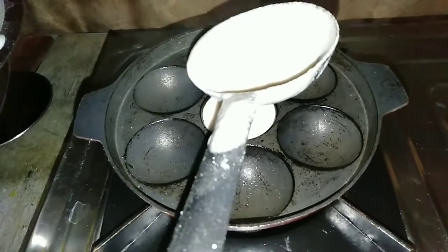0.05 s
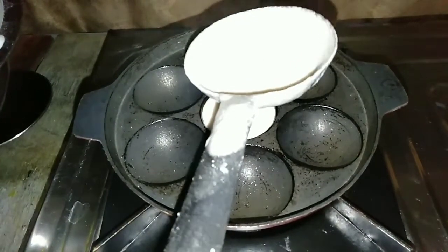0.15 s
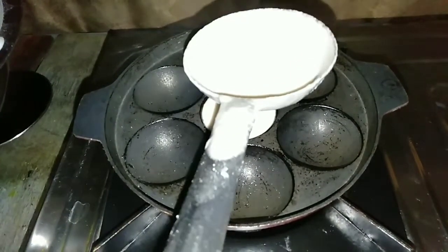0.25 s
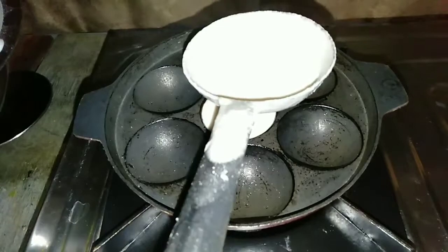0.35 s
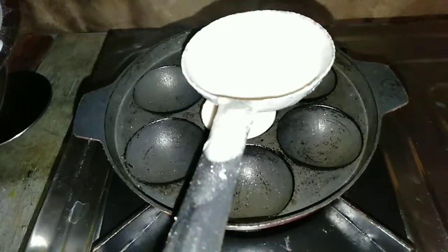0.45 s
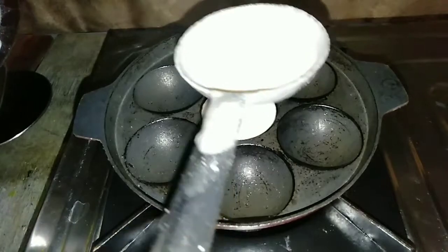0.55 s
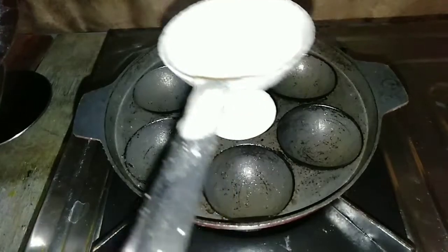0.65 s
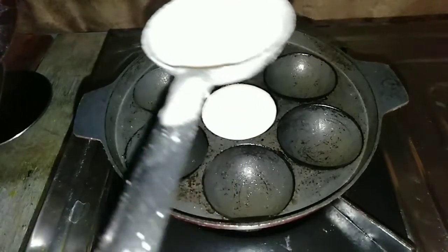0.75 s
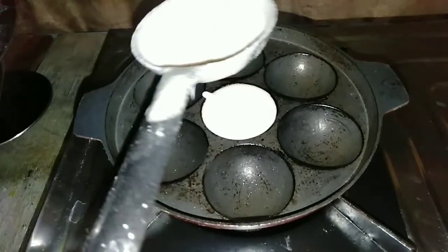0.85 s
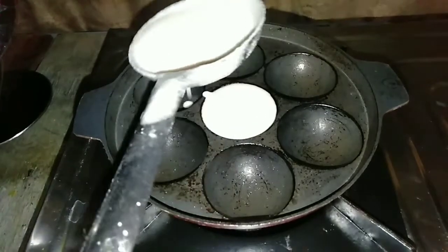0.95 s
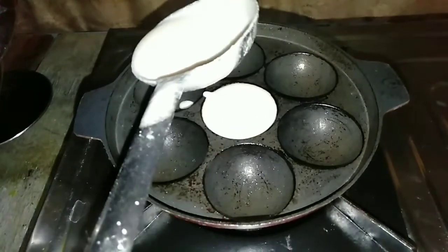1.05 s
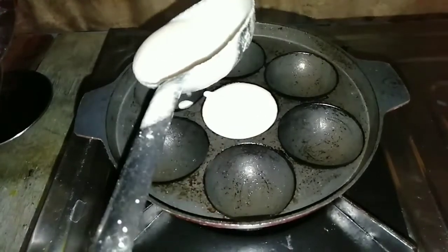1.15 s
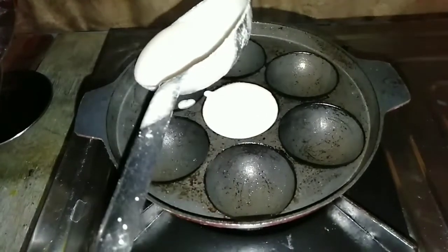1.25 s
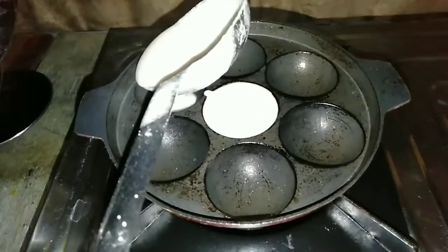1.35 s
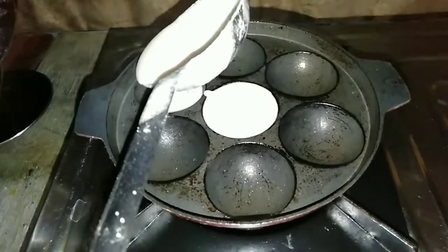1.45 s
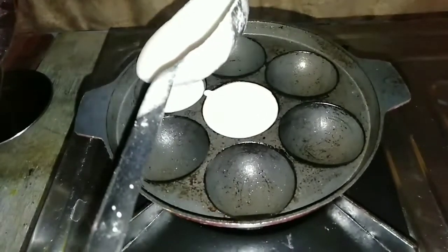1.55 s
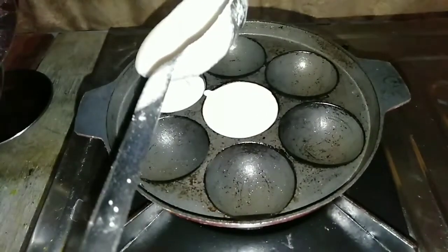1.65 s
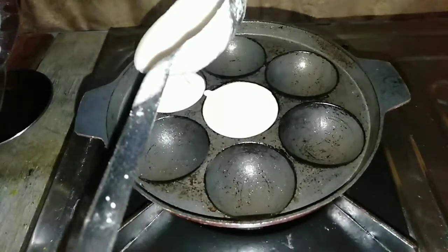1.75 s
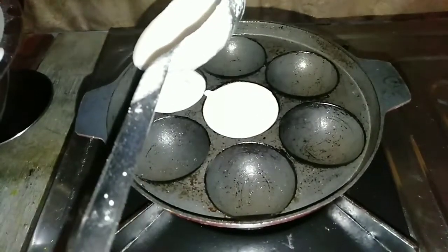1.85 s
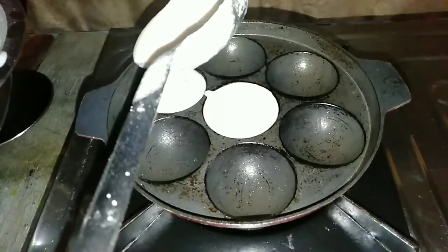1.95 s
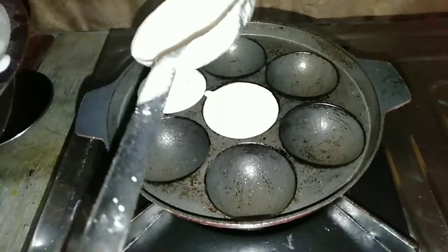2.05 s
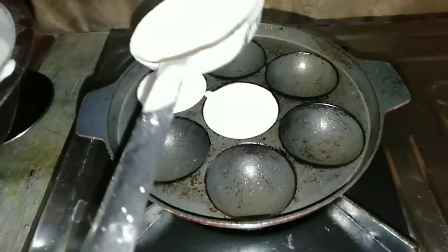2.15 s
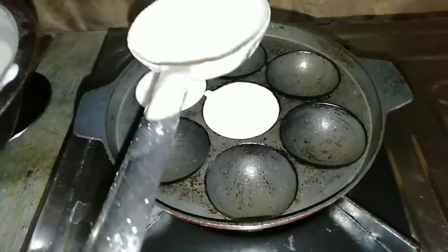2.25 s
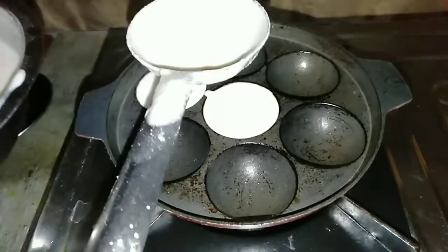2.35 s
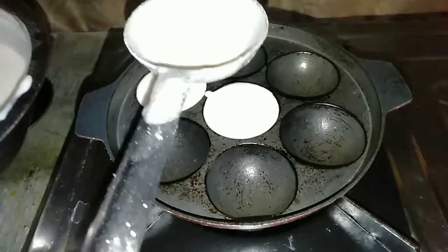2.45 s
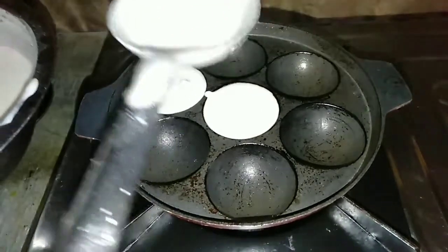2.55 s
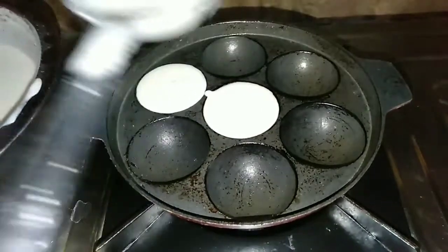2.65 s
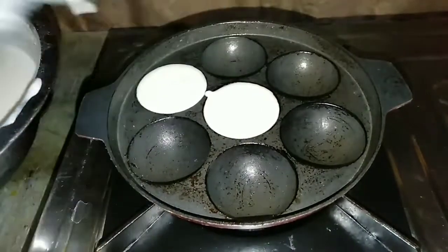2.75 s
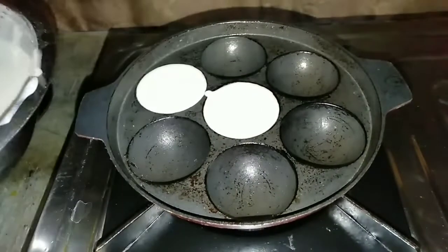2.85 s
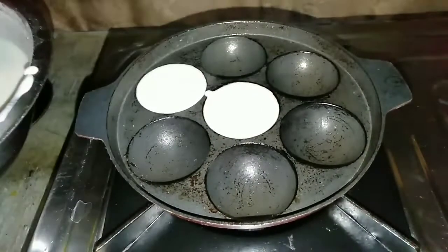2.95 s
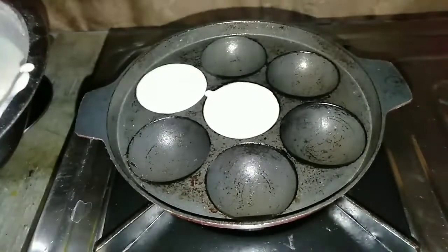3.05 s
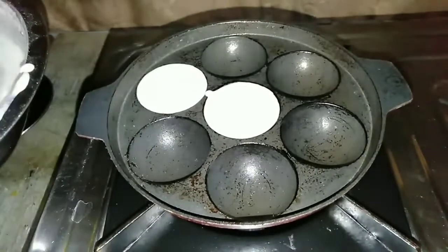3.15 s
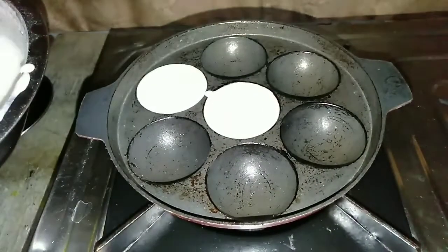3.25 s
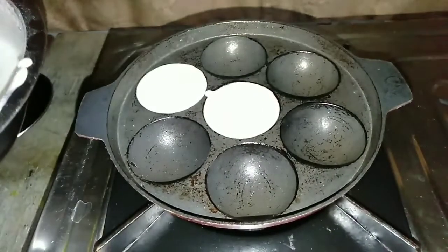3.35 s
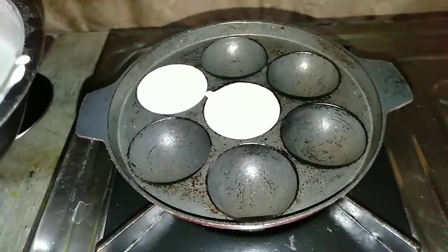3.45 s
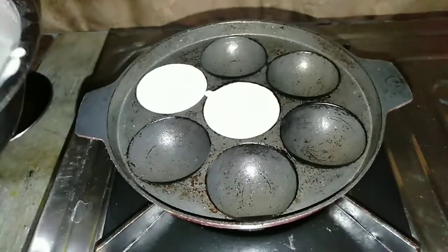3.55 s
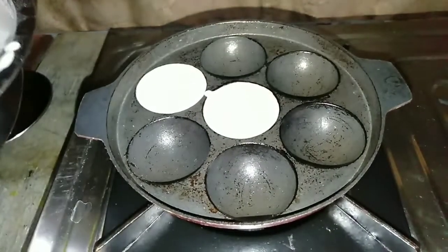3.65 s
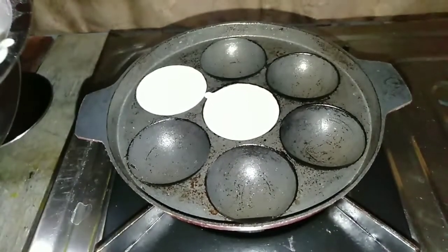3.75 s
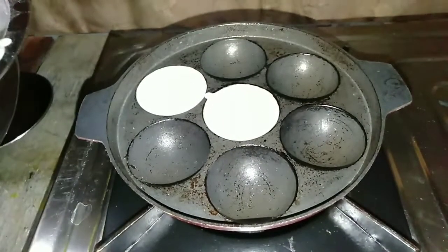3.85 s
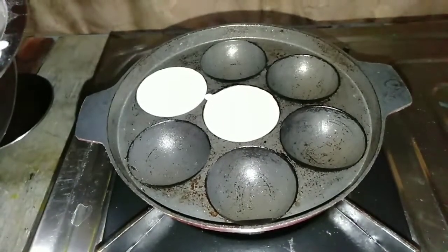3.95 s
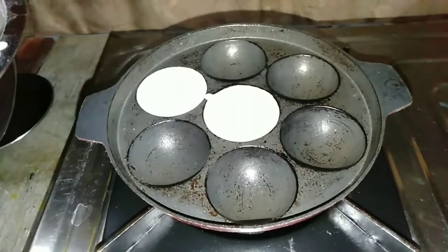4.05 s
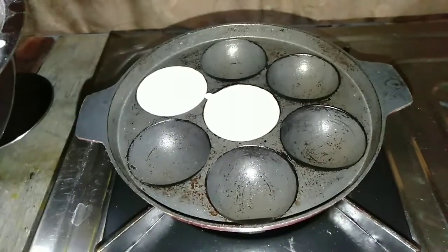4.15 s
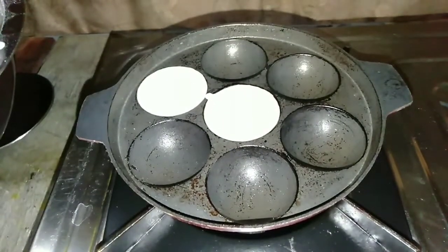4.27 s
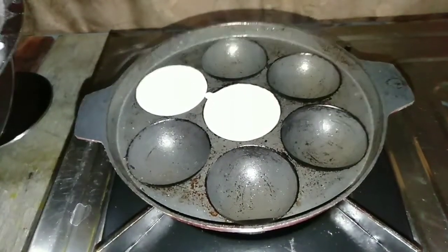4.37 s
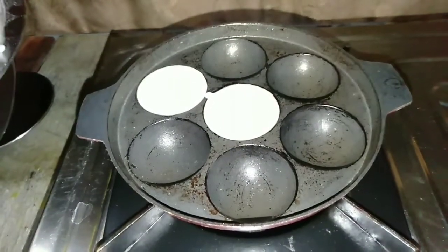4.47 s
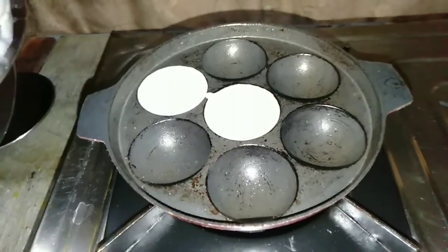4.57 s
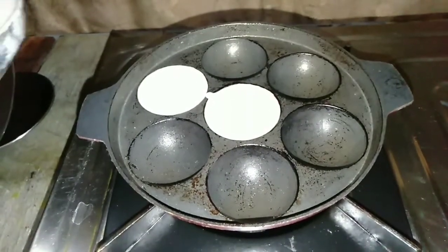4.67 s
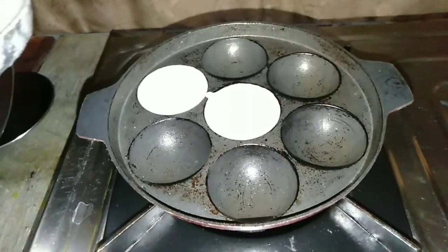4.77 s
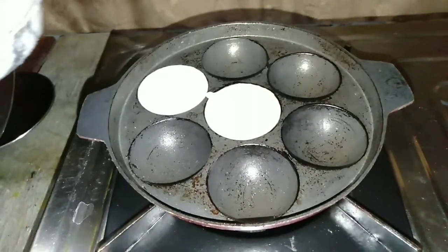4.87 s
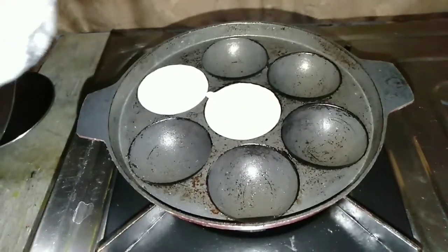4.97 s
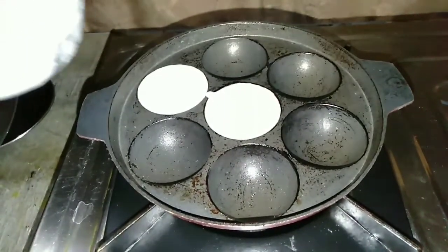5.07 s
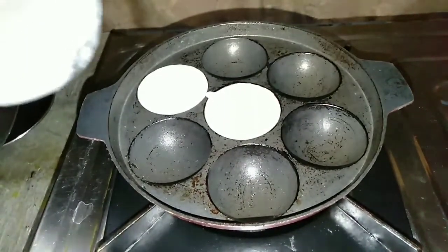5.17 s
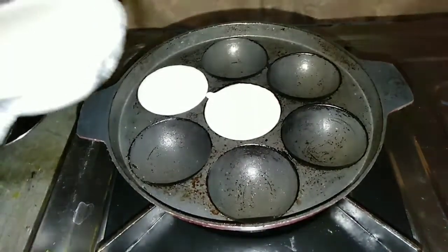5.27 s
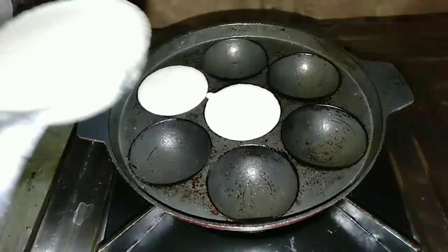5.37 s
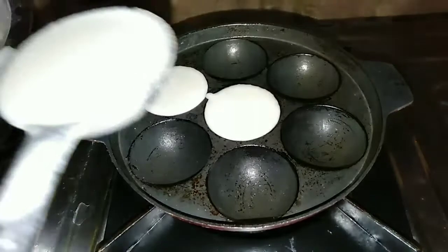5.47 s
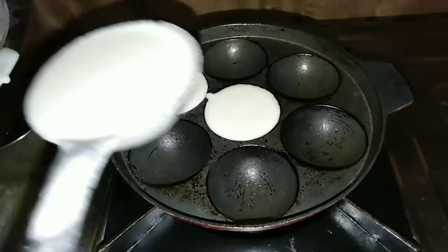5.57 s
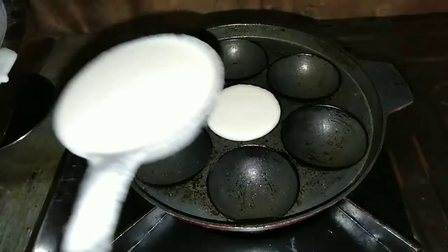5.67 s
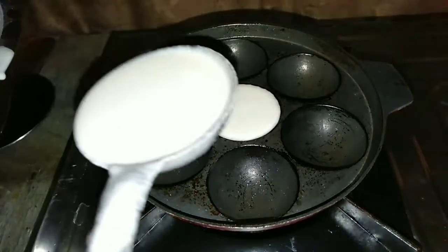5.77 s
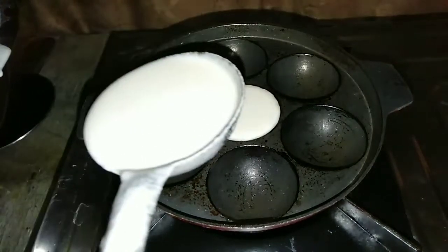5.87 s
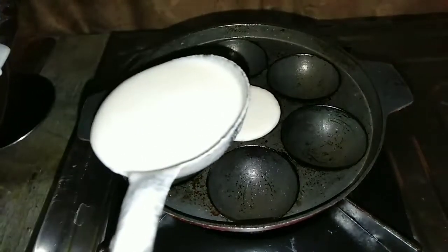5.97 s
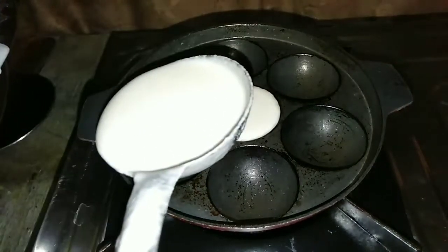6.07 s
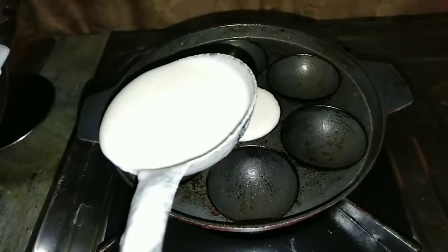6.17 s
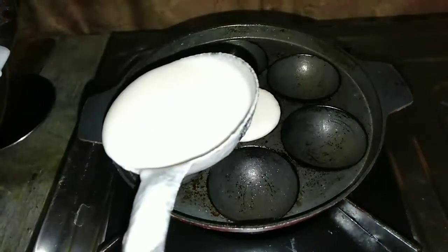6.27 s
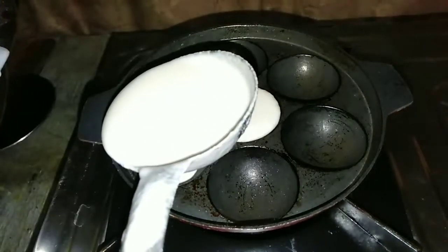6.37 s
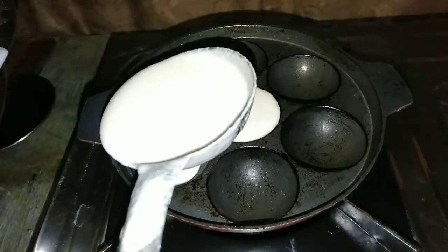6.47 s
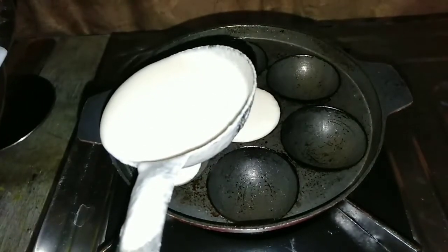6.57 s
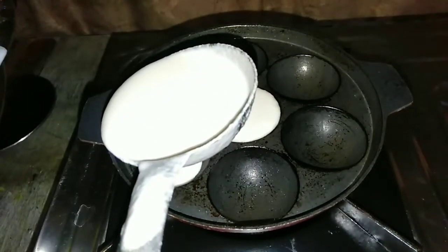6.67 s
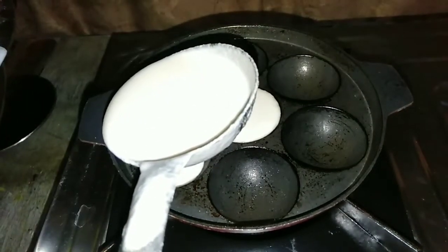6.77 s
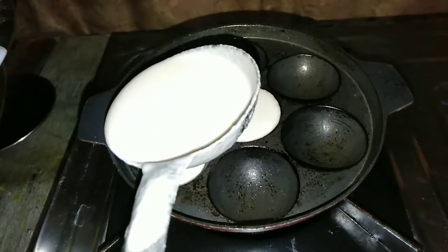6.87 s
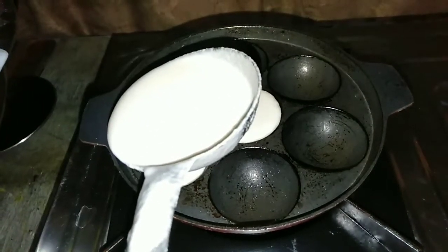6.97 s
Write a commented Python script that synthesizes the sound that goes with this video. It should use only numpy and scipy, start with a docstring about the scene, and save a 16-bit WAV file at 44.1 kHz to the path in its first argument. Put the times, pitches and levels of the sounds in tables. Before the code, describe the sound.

A bright, crisp sizzle is under way from the start as batter meets a hot oiled mould pan, heard close in a small kitchen. It dips near 0.6 seconds, then flares in short bursts with a few pops. At 1.4 seconds a second pour brings a louder, dense crackle with a thin, faint ring from the pan. From about 2.2 seconds it fades to a quiet simmer, dotted with sharp single spits that grow weaker. A soft, dull bump comes through the counter at 3.8 seconds. A ladle faintly scrapes the batter bowl from 4.3 to 4.7 seconds and taps it lightly twice around 5 seconds. After another soft bump at 6 seconds, a third pour spurts at 6.2 and sizzles fully from 6.4, with a sharp pop, until the end at 7 seconds. A faint burner rumble, motor hum and room air continue throughout.

```python
"""A small kitchen, close to a hot cast pan: batter is ladled into its oiled wells three times.
Each pour boils off as a dense crackle of steam bubbles that rings the pan and thins into single spits.
Between pours the ladle scrapes and taps the bowl, and two soft bumps come through the counter.
Under it all are the rumble of the burner flame, a motor hum and room air."""
import sys
import numpy as np
from scipy import signal
from scipy.fft import rfft, irfft
from scipy.io import wavfile
from scipy.ndimage import uniform_filter1d

SR = 44100
rng = np.random.default_rng(int(sys.argv[2]) if len(sys.argv) > 2 else 0)


def int16_out(signal):
    """Quantize to a 16-bit WAV file."""
    q = np.round(np.clip(np.atleast_2d(signal).T, -1, 1) * 32767)
    wavfile.write(sys.argv[1], SR, q.astype(np.int16))


N = 309141

# Batter fills a well. The boil has four layers: low seething, middle fizz, high spray and pan ring.
# Each row: start, rise and hold in seconds, drop to the simmer in dB, then each layer's level in dB.
POURS = [(-0.1, 0.013, .51, -11.5, -38, -34.5, -28, -60),
         (1.446, 0.028, 0.7, -12, -33.5, -28.5, -25.5, -51), (6.386, 0.047, .7, -7, -35, -29.5, -25, -51)]
# First drips and brief swells of the boil.
# Each row: start, rise and hold in seconds, fade in dB per second, then each layer's level in dB.
SWELLS = [(0.598, 0.047, 0.17, 85.5, -46.5, -40, -37.5, -74),
          (0.861, 0.043, 0.19, 69, -40, -35.5, -29.5, -75), (1.187, 0.025, 0.095, 51, -42.5, -37, -32, -75),
          (1.265, 0.067, 0.073, 25, -36.5, -38.5, -54, -42.5),
          (4.31, 0.033, 0.7, 150, -62, -58.5, -65, -70), (5.617, 0.021, 0.18, 55, -66, -59, -52.5, -89),
          (6.03, 0.04, .04, 65, -61.5, -58, -50.5, -85), (6.152, 0.05, 0.13, 45, -38, -34.5, -34, -55)]


def boil_db(t):
    """Levels of the four layers: batter flares on contact, quietens as a crust forms, then simmers dry."""
    flare_db, flare_s = np.c_[[1.8, 4.8, 0.66, 0.4]], 0.038  # np.c_ holds one value for each layer
    sag_db_per_s = np.c_[[1.04, 0.25, 0.28, 1.1]]
    crust_db_per_s, cooling_db_per_s = 26.5, np.c_[[3.62, 3.54, 2.42, 3.7]]
    drying_db_per_s2 = np.c_[[0.59, 0.67, 0.84, 0.27]]  # the simmer dies ever faster as the batter sets
    power = 1e-14
    for start, rise, hold, drop_db, *layer_db in POURS:
        since = np.maximum(t - start - rise, 0)
        after = np.maximum(since - hold, 0)
        onset_db = -13 * np.maximum(1 - (t - start) / rise, 0) + flare_db * np.exp(-since / flare_s)
        pouring = amp(np.c_[layer_db] + onset_db - sag_db_per_s * (since - after))
        crust = amp(-crust_db_per_s * after)
        simmer = amp(-cooling_db_per_s * after - drying_db_per_s2 * after ** 2)
        simmer_share = amp(drop_db) ** 2
        power = power + pouring ** 2 * ((1 - simmer_share) * crust ** 2 + simmer_share * simmer ** 2)
    for start, rise, hold, fade_db_per_s, *layer_db in SWELLS:
        since = t - start - rise
        swell_db = 20.5 * np.minimum(since / rise, 0) - fade_db_per_s * np.maximum(since - hold, 0)
        power = power + amp(np.c_[layer_db] + swell_db) ** 2
    return 10 * np.log10(power)


def treble_db(t):
    """The level of fizz and spray together."""
    return 10 * np.log10((amp(boil_db(t)[1:3]) ** 2).sum(0))


# The tone of the boil as the ladle covers or fills each well.
# Each row is one tone curve, made of pairs: frequency in Hz, relative level in dB.
WELL_TONES = [
    [(210, -35), (350, -21), (497, -4), (827, -5.5), (1020, -5.5), (1660, -2.5), (3810, -7), (4400, -13.5),
     (11800, -3), (15700, -7.5)],
    [(210, -49.5), (350, -30.5), (489, -8.5), (827, -13.5), (1000, -11), (2080, -8.5), (4470, -13),
     (6440, -7), (8580, -9.5), (11600, -3), (15700, -7.5)],
    [(210, -43), (480, -11), (827, -4), (1050, -17), (1660, -3), (2770, -7.5), (5200, -1.5), (8100, -8),
     (11600, 3.5), (15700, -6)],
    [(210, -29), (480, -8), (827, -3), (1020, -6.5), (1660, -1), (2770, -3.5), (3990, -6), (8180, -5),
     (11600, -1), (15700, -5)],
    [(210, -45), (400, -7), (700, -1), (1050, -5), (1660, -3.5), (2770, -6), (4600, -5), (5750, -3),
     (8200, -4), (11600, -1.5), (15700, -7.5)],
    [(210, -60), (480, -11.5), (1170, -6.5), (1420, -6), (1890, -8), (2360, -3), (5050, -18), (5750, -6),
     (6200, -10.5), (9400, -10.5), (10400, -6.5), (11700, -7), (13400, -14.5), (15700, -15)],
]
# Each entry: the time in seconds when the next curve takes over.
NEXT_TONE_S = [0.558, 1.32, 1.65, 2.64, 6.151]


def sizzle():
    """Steam bubbles burst: crisp fizz and spray over smoother seething, coloured by well and pan."""
    fierce = np.clip(1 + per_sample(treble_db) / 60, 0, 1)  # loud boiling is denser
    crisp = bubbles(per_s=5000, spread_db=4.4, clump_db=0.89, hiss=0.19 + 0.71 * fierce)
    crisp = roaming(wall_echoes(crisp, echo_db=-2.3, decay_s=0.026))
    soft = bubbles(per_s=3000, spread_db=2.3, clump_db=0.25, hiss=0.51)
    soft = roaming(wall_echoes(soft, echo_db=0.67, decay_s=0.034))
    frames = dict(fs=SR, nperseg=256, noverlap=192)
    hz, t, crisp = signal.stft(unit_rms(crisp), **frames)
    soft = signal.stft(unit_rms(soft), **frames)[2]
    tone_db = np.array([curve_at(well, hz) for well in WELL_TONES])[np.searchsorted(NEXT_TONE_S, t)].T
    tone_db = uniform_filter1d(tone_db, int(0.12 / t[1]), 1)  # one tone melts into the next
    tone = amp(tone_db + 1.17 * patches(tone_db.shape, bins=4, frames=50))
    seethe, fizz, spray = amp(boil_db(t)[:3])
    low, high = hz < 3500, hz >= 9000
    spectrum = 0
    for band, crackle, level in ((low, soft, seethe), (~low & ~high, crisp, fizz), (high, crisp, spray)):
        gain = tone * band[:, None]
        power = np.mean(abs(crackle) ** 2, 1, keepdims=True)
        share_passed = (gain ** 2 * power).sum(0) / power.sum()
        spectrum = spectrum + level * crackle * gain / np.sqrt(share_passed)
    return signal.istft(spectrum, **frames)[1][:N]


def bubbles(per_s, spread_db, clump_db, hiss):
    """Tiny bursts click in unequal sizes and come in clumps; hiss (0 to 1) blends in smooth noise."""
    size = amp(spread_db * np.minimum(rng.exponential(1, N), 5)) * rng.choice([-1., 1.], N)
    clicks = unit_rms(size * (rng.random(N) < per_s / SR))
    clumps = amp(clump_db * (drift(110) + 0.8 * drift(1550) + 0.53 * drift(5100)))
    return unit_rms(clumps * (hiss * rng.standard_normal(N) + (1 - hiss) * clicks))


def wall_echoes(x, echo_db, decay_s, spots=10):
    """Rim and wall answer each click within milliseconds, differently for every spot in the pan."""
    t, spot = np.arange(1000) / SR, rng.integers(0, spots, N)
    echoes = rng.standard_normal((spots, len(t))) * amp(-60 * t / decay_s) * (t > 0.0007)
    echoes /= np.linalg.norm(echoes, axis=1, keepdims=True)
    return x + amp(echo_db) * sum(signal.oaconvolve(x * (spot == k), echoes[k])[:N] for k in range(spots))


def roaming(x):
    """The boil wanders between two spots that ring the pan differently."""
    turn = np.pi / 4 * (1 + np.tanh(2 * drift(0.13 * SR)))
    return through_pan(x * np.cos(turn) ** 2, spot=-1.1) + through_pan(x * np.sin(turn) ** 2, spot=0.89)


# How the pan and its hollow wells ring. Each row: pitch in Hz, width in Hz, boost or dip in dB.
PAN_RESONANCES = [(575, 28, -10.5), (1272, 38, -5.5), (836, 55, 3.5), (1050, 97, -9.5), (1150, 43, -16),
                  (2550, 240, -3), (1423, 28, 4.5), (1674, 50, 7), (2046, 62, 6), (2385, 113, 6),
                  (3380, 480, 4.5), (4040, 310, 4.5), (5717, 200, 6.5), (6400, 940, 5), (7480, 280, 4),
                  (11940, 1300, 1)]


def through_pan(x, spot=0):
    """The pan boosts some pitches and dips others; the spot shifts each a little in pitch and depth."""
    hz, gain_db = abs(np.fft.fftfreq(16384, 1 / SR)), 0
    for k, (pitch, width, db) in enumerate(PAN_RESONANCES):
        shifted_hz = hz * (1 + 0.0054 * spot * np.sin(k ** 2 + 1))
        depth_db = db * (1 + 0.3 * spot * np.cos(k ** 2))
        gain_db = gain_db + depth_db / (1 + (2 * (shifted_hz - pitch) / width) ** 2)
    response = np.exp(signal.hilbert(np.log(amp(gain_db))).conj())  # rings only after each click
    return signal.oaconvolve(x, np.fft.ifft(response).real[:6000])[:len(x)]


# Single large bubbles. Each row: start in seconds, peak in dB before the pan colours it,
# level of the lower part in dB relative to the upper part.
SPITS = [(0.693, -14, -18), (0.734, -15, -22), (0.754, -16, -20), (0.8, -14, -24), (2.1064, -12, -14),
         (2.226, -14, -7), (2.264, -18, -12), (2.3914, -16, -14), (2.446, -16, -23), (2.5301, -13.5, -22),
         (2.7621, -18, -18), (2.8749, -16.5, -14.5), (2.9392, -9, -25), (3.051, -18, -16.5),
         (3.392, -20, -14), (3.7282, -16, -39.5), (4, -26, -26), (4.3595, -21.5, -23), (4.731, -26.5, -24),
         (4.9115, -25, -20), (5.0375, -24, -11), (5.254, -33, -13), (5.408, -31, -8), (5.4455, -35, -28),
         (5.6665, -30, -26), (5.676, -33, -20), (5.93, -34, -24.5), (5.952, -33, -24), (6.1925, -20, -6),
         (6.4596, -8, -22), (6.5984, -23, -21)]


def spits():
    """A large bubble bursts: two sharp cracks and a short spray; wide bubbles reach lower."""
    out, t = np.zeros(N), np.arange(600) / SR
    for start, db, low_db in SPITS:
        burst = 0.5 * rng.standard_normal(len(t)) * strike(t, rise_s=0.002, decay_s=0.032)
        burst[[12, 48]] -= np.clip(2 + db / 30, 0.2, 1) * np.array([1.6, 2.4])  # big ones crack harder
        high, low = ring(burst, hz=11300, width=4800), ring(burst, hz=4900, width=4600)
        add(out, start, amp(db) * unit_peak(unit_peak(high) + amp(low_db) * unit_peak(low)))
    return through_pan(out)


def pan_ring(hz=1105, width=34):
    """Boiling keeps one thin note of the pan singing; it lags behind the boil and falters."""
    noise, lag = rng.standard_normal(N), np.exp(-1 / (0.023 * SR))
    drive = amp(per_sample(lambda t: boil_db(t)[3]))
    level = signal.lfilter([1 - lag], [1, -lag], drive) * amp(1.5 * drift(1500))
    return level * unit_rms(ring(ring(noise, hz, width), hz, 3 * width))


# The notes of the batter bowl. Each row: pitch in Hz, width in Hz, relative level in dB.
BOWL_NOTES = [(600, 23, -3), (886, 154, -0.5), (1392, 31, 5.5), (1675, 180, -5.5), (2370, 130, -4),
              (2995, 59, 0), (4000, 75, -11)]
# The ladle touches the bowl. Each row: start in seconds, peak in dB, pitch it rings most in Hz.
LADLE_TAPS = [(4.954, -46, 2970), (5.045, -41.5, 1700)]


def ladle():
    """The ladle sticks and slips, ringing the bowl more dully as it slows, then taps it lightly."""
    slips = bubbles(per_s=1600, spread_db=1.2, clump_db=1.0, hiss=0.52)  # the same clicks serve as ticks
    notes = {hz: amp(db) * unit_rms(ring(ring(slips, hz, width), hz, 3 * width)) * np.sqrt(width)
             for hz, width, db in BOWL_NOTES}
    t = np.arange(N) / SR
    start_s, fastest_s, end_s = 4.282, 4.464, 4.68
    speed = np.interp(t, (start_s, fastest_s, end_s), (0, 1, 0))
    tilt_db_per_octave = np.clip(6.5 - 35 * (t - start_s), -6, 6)
    scrape = sum(note * amp(tilt_db_per_octave * np.log2(hz / 1400)) for hz, note in notes.items())
    out = amp(-41) * speed ** 1.33 * scrape / np.std(sum(notes.values()))
    t = np.arange(4000) / SR
    for start, db, tap_hz in LADLE_TAPS:
        tap = sum(note[:len(t)] / (1 + ((hz - tap_hz) / 250) ** 2) for hz, note in notes.items())
        add(out, start, amp(db) * unit_peak(tap * strike(t, rise_s=0.0055, decay_s=0.098)))
    return out


# Soft bumps. Each row: start in seconds, peak in dB, pitch in Hz, seconds to fade by 60 dB.
BUMPS = [(3.846, -42, 69.6, 0.052), (6.044, -45.5, 133, 0.17)]


def counter_bumps():
    """A bump comes through the counter as a dull thud: a low tone mixed with low noise."""
    out, t = np.zeros(N), np.arange(6000) / SR
    for start, db, hz, decay_s in BUMPS:
        noise = unit_rms(ring(ring(rng.standard_normal(len(t)), hz, hz), hz, hz))
        thud = (np.sin(2 * np.pi * hz * t) + 0.86 * noise) * strike(t, 0.0055, decay_s)
        add(out, start, amp(db) * unit_peak(thud))
    return out


# How loud the flame is. Each row: time in seconds, level in dB.
FLAME_LEVELS = [(0.0, -59.5), (2.8, -61.5), (5.5, -64.5), (7.01, -53.5)]


def flame():
    """The burner flame flutters with a low rumble."""
    level = amp(np.interp(np.arange(N) / SR, *np.transpose(FLAME_LEVELS)))
    return level * unit_rms(ring(ring(rng.standard_normal(N), hz=49.4, width=19), hz=50, width=40))


# The tones of the hum. Each row: multiple of the shaft's turning rate, average level in dB.
MOTOR_TONES = [(1, -77), (2, -63.5), (6, -79), (8, -69), (10, -68.5)]


def motor(shaft_hz=49.06):
    """A motor hums at multiples of its turning rate; each tone wavers in level."""
    turns = np.cumsum(shaft_hz * (1 + 0.0021 * drift(6800))) / SR
    return sum(amp(db + 2.4 * drift(2900)) * np.sqrt(2) * np.sin(2 * np.pi * (k * turns + rng.random()))
               for k, db in MOTOR_TONES)


# The tone of the room's air. Each row: frequency in Hz, relative level in dB.
AIR_TONE = [(12, -32), (20, 10.5), (80, -10), (145, 3.5), (334, -5), (490, 1), (539, -8), (1210, -10),
            (1650, -9.5), (2600, -13), (6000, -20), (7800, -44)]


def room_air():
    """Steady room noise, strongest in the bass."""
    gain = amp(curve_at(AIR_TONE, np.fft.rfftfreq(N, 1 / SR)))
    return amp(-59.5) * unit_rms(irfft(rfft(rng.standard_normal(N)) * gain, N))


# The tone of the shimmer. Each row: frequency in Hz, relative level in dB.
TREBLE_SHIMMER = [(100, -37), (3800, -70), (4400, 1.5), (5600, -11.5), (9000, -17), (15000, -14)]


def shimmer(mix):
    """A random-phase copy of the mix that comes and goes in patches, mostly in the treble."""
    hz, t, spectrum = signal.stft(mix, SR, nperseg=512)
    gain_db = curve_at(TREBLE_SHIMMER, hz)[:, None] + 6.1 * patches(spectrum.shape, bins=10, frames=12)
    gain_db -= 0.12 * (treble_db(t) + 52)  # relatively weaker when the sizzle is loud
    random_phase = np.exp(2j * np.pi * rng.random(spectrum.shape))
    return signal.istft(spectrum * amp(gain_db) * random_phase, SR, nperseg=512)[1][:N]


def amp(db):
    return 10 ** (np.asarray(db) / 20)


def unit_rms(x):
    return x / np.sqrt(np.mean(x ** 2) + 1e-20)


def unit_peak(x):
    return x / abs(x).max()


def curve_at(points, hz):
    point_hz, db = np.transpose(points)
    return np.interp(np.log(hz + 1), np.log(point_hz + 1), db)


def add(mix, start_s, sound):
    part = mix[round(start_s * SR):][:len(sound)]
    part += sound[:len(part)]


def strike(t, rise_s, decay_s):
    """A quick rise and a fade of 60 dB in decay_s."""
    return np.minimum(t / rise_s, 1) * amp(-60 * t / decay_s)


def ring(x, hz, width):
    """A resonance: passes a band around one pitch."""
    return signal.lfilter(*signal.iirpeak(hz, hz / width, SR), x)


def drift(samples):
    """A random wobble that changes over about this many samples."""
    size = int(samples)
    return unit_rms(uniform_filter1d(uniform_filter1d(rng.standard_normal(N), size), size))


def patches(shape, bins, frames):
    """Random blotches across frequency and time."""
    return unit_rms(uniform_filter1d(uniform_filter1d(rng.standard_normal(shape), bins, 0), frames, 1))


def per_sample(rule):
    """Fills in a slow curve over time for every sample."""
    coarse_s = np.arange(0, N + 256, 64) / SR
    return np.interp(np.arange(N) / SR, coarse_s, rule(coarse_s))


def scene():
    """All sources in the centre; the shimmer is added on the left and subtracted on the right."""
    mid = sizzle() + spits() + pan_ring() + ladle() + counter_bumps() + motor() + flame() + room_air()
    side = shimmer(mid)
    return np.array([mid + side, mid - side])


def record(dry):
    """Cuts the treble above 15730 Hz."""
    return signal.oaconvolve(dry, signal.firwin(1501, 15730, window=("kaiser", 9), fs=SR)[None], "same")


dry = scene()
out = record(dry)
int16_out(out)
```